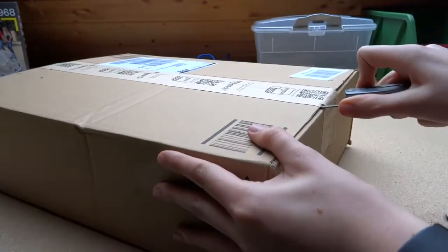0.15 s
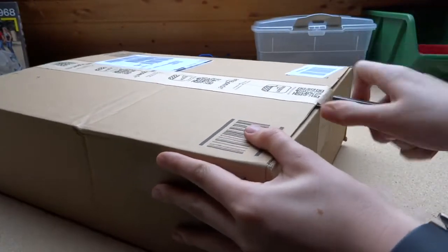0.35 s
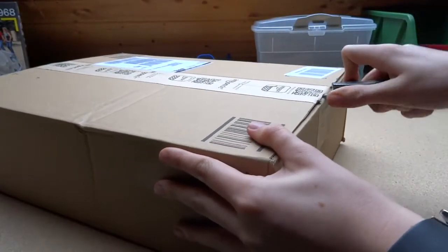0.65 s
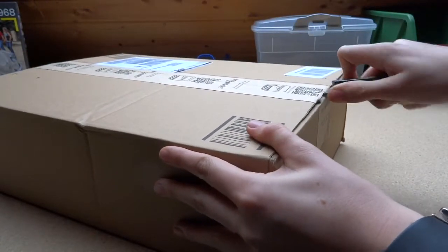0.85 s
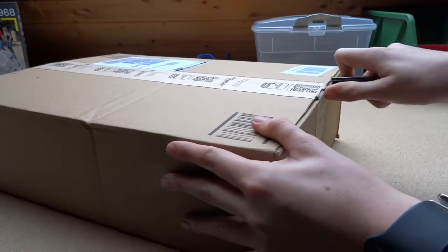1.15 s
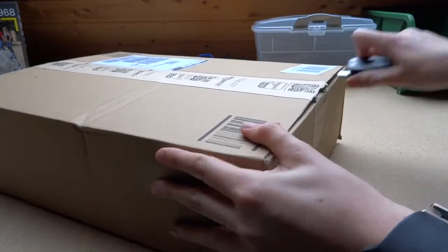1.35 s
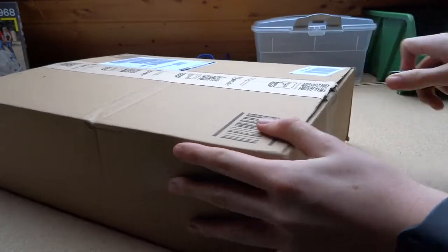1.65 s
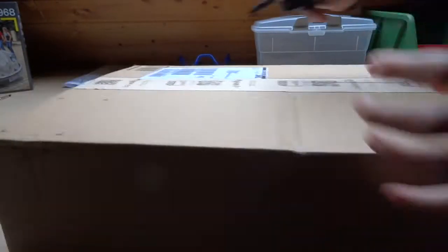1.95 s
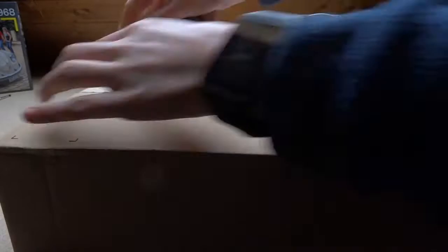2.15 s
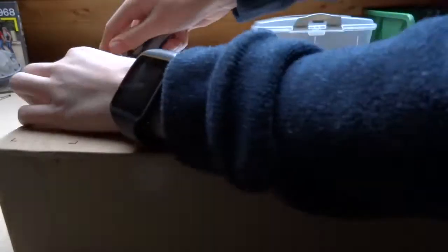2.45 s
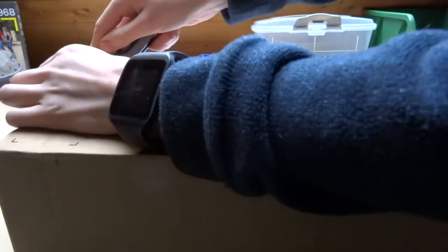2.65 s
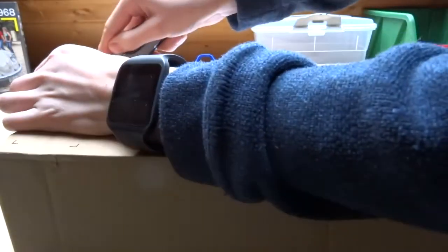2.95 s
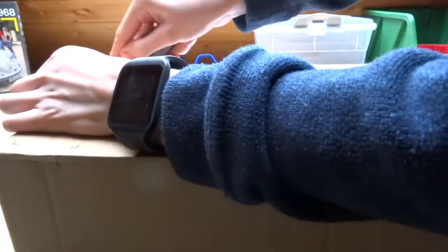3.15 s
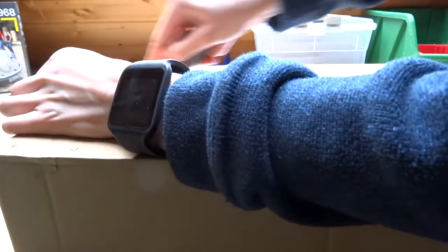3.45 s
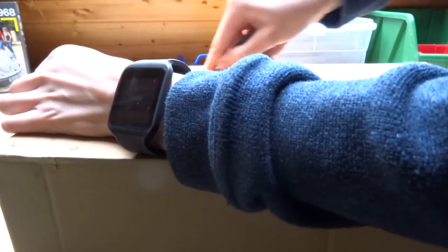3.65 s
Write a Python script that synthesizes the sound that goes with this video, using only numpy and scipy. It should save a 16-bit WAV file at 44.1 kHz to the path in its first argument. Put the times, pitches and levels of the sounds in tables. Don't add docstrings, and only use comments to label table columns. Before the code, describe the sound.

Blade on packing tape, close and dry: sharp knocks and crackling rips, a gritty cardboard slide with small squeaks, faint rubs and ticks, then a dense burst of hollow snaps in a quiet room.

```python
import sys
import numpy as np
from scipy import signal
from scipy.fft import rfft, irfft
from scipy.io import wavfile
from scipy.ndimage import uniform_filter1d

SR = 44100
rng = np.random.default_rng(int(sys.argv[2]) if len(sys.argv) > 2 else 0)


def nominal_scale(level):
    x = np.asarray(level, float) / 20
    return 10 ** x


def wrap_up_sound(samples):
    columns = np.atleast_2d(samples).T
    tamed = np.clip(columns, -1, 1)
    steps = np.round(tamed * 32767).astype(np.int16)
    wavfile.write(sys.argv[1], SR, steps)


N = 167580

# start_s, knock_peak_db, knock_pitch_hz,
# tape_db
BLADE_SNAPS = [(0.2924, -3, 7700, -23), (0.298, -14, 6950, -30.5), (.415, -13.5, 1380, -30),
               (0.436, -15, 1400, -41), (.494, -21, 1150, -19), (0.503, -9.5, 398, -47),
               (.519, -39, 775, -24), (0.6113, -27, 9000, -34.5), (0.716, -31, 1570, -37),
               (0.851, -28, 1420, -26), (.863, -11, 934, -20.5), (0.922, -13, 1570, -21),
               (1.126, -23, 670, -43), (1.3229, -10, 1300, -17), (1.392, -3.5, 1210, -15),
               (1.5054, -13, 1190, -42), (1.509, -17, 448, -60),
               (2.237, -32, 1130, -47), (2.241, -36.5, 232, -78), (2.385, -29, 1110, -61),
             (2.4425, -21.5, 1610, -47), (2.447, -27, 426, -70), (2.68, -31.5, 840, -47),
             (2.768, -40, 415, -42), (3.065, -27, 650, -31.5), (3.087, -19, 2120, -33.5),
             (3.169, -34, 925, -34), (3.208, -17.5, 2200, -43), (3.265, -24, 920, -34),
             (3.303, -36, 950, -35), (3.339, -5.5, 2100, -27), (3.365, 0.5, 2110, -22.5),
             (3.394, -18.5, 355, -27.5), (3.436, -22, 560, -36), (3.458, -12, 513, -24),
             (3.48, -1.5, 580, -24), (3.504, -7, 805, -42), (3.522, -7.5, 387, -22), (3.549, -2, 371, -20),
             (3.571, -6, 1000, -46), (3.783, -2.5, 734, -21.5)]
# start_s, length_s, box_db, tape_db
LONG_RIPS = [
    (0.481, 0.023, -27, -21),
    (0.86, 0.046, -32.5, -29.5),
    (1.327, 0.081, -26, -24.5),
    (2.768, 0.0057, -40, -48.5),
    (3.086, 0.0092, -42, -47),
    (3.498, 0.097, -24, -26),
    (3.72, .1, -26.5, -30.5),
]
# start_s, length_s, box_db, tape_db
SHORT_SLIPS = [(.655, 0.0045, -64, -38.5), (.666, 0.0044, -70, -39), (.689, 0.0061, -70, -46.5),
               (.727, 0.0044, -62, -34.5), (.74, 0.0033, -62, -28.5), (.76, 0.0057, -51, -39),
               (1.012, 0.0032, -60, -35), (1.258, .004, -55, -41), (1.3, 0.021, -46, -42),
               (1.352, 0.0052, -38, -24), (1.368, .008, -33, -22), (1.728, 0.0084, -39, -36),
               (1.748, 0.0064, -49, -29), (1.786, 0.0047, -54, -19.5), (1.81, 0.02, -34.5, -23),
               (1.85, 0.0063, -44, -23), (2.782, 0.0049, -46, -47), (3.088, 0.014, -40, -38),
               (3.204, 0.0077, -32.5, -27.5), (3.258, 0.013, -34, -32.5), (3.3, 0.016, -35.5, -39),
               (3.432, 0.0095, -25.5, -25), (3.453, 0.012, -21, -26.5), (3.518, 0.005, -26, -26.5),
               (3.572, 0.0084, -20, -27.5), (3.775, 0.004, -15, -23)]
# time_s, slips_per_s, level_db
BLADE_CHATTER = [
    (1.33, 262, -28),
    (1.345, 320, -24.5),
    (1.37, 333, -22.5),
    (1.388, 318, -22.5),
    (1.4, 100, -62),
]
# centre_s, band_hz, width_hz, level_db, half_length_s
BLADE_SINGS = [
    (.885, 1450, 400, -32, .025),
    (1.362, 10300, 1600, -28, .022),
    (2.93, 6900, 400, -59, .02),
    (2.96, 3250, 550, -57, .07),
    (3.05, 5400, 650, -49, .05),
    (3.73, 4650, 550, -43, .07),
    (3.73, 9600, 1000, -43, .07),
]
# centre_s, pitch_hz, level_db, second_partial_db,
# half_length_s
LOAD_SQUEAKS = [
    (.83, 1400, -48, -62, .02),
    (1.415, 1280, -31, -45, .012),
    (1.736, 1220, -31, -32, .007),
    (1.753, 1200, -33, -40, .005),
    (1.79, 2750, -52, -37, .004),
    (1.817, 1250, -31, -45, .004),
    (1.818, 950, -45, -29, .005),
    (1.831, 1220, -38, -24, .007),
    (1.855, 1180, -34, -35, .005),
    (2.325, 1100, -54, -72, .035),
                (.4965, 3100, -20.5, -52, 0.0052),
    (0.502, 1500, -21.5, -45, 0.0052),
    (0.51, 500, -29, -39, 0.002),
    (1.99, 1450, -43, -70, 0.015),
    (2.1, 620, -57, -80, 0.07),
    (3.215, 2150, -31, -57, .005),
    (3.443, 540, -18.5, -30, 0.0068),
    (3.455, 530, -17, -30, 0.0054),
    (3.588, 2200, -29.5, -44, 0.023),
]
# time_s, speed_db
SLIDE_SPEED = [
    (1.57, -58),
    (1.63, -38),
    (1.72, -30),
    (1.77, -27),
    (1.86, -28),
    (2.0, -35),
    (2.075, -42.5),
    (2.105, -58),
    (2.19, -77),
]
# start_s, length_s, box_db, hiss_db
BOX_RUBS = [(-.04, 0.18, -50.5, -48), (.115, 0.15, -45.5, -38.5), (.301, 0.075, -50, -43.5),
            (.352, 0.13, -44.5, -39.5), (.54, 0.036, -43.5, -44), (.6, 0.037, -52.5, -50),
            (.655, 0.048, -68, -54), (.715, 0.075, -50.5, -45), (.8, 0.033, -45, -46),
            (.94, 0.2, -48.5, -45), (1.045, 0.14, -44.5, -45.5), (1.25, 0.14, -42, -49),
            (1.43, 0.12, -39, -40.5), (1.5, 0.02, -62, -42), (2.03, 0.058, -50, -75),
            (2.29, 0.031, -66, -53.5), (2.435, 0.15, -50.5, -53.5), (2.62, 0.091, -62.5, -80),
            (2.855, 0.13, -50.5, -52.5), (2.995, 0.1, -47.5, -45), (3.135, 0.28, -45, -42.5),
            (3.375, 0.046, -30, -32.5), (3.44, 0.051, -42, -31), (3.6, 0.15, -31.5, -35.5)]
# freq_hz, gain_db
BOX_TONE = [(40, -49), (120, -13.5), (220, -2.5), (400, -2), (1250, 0), (2500, -3), (4000, -13.5),
            (7000, -57.5)]
# freq_hz, width_hz, gain_db
BOX_MODES = [(230, 44, 1), (397, 27, 4), (544, 57, -2.5), (780, 210, -9.5), (960, 60, 1), (1300, 31, -32),
             (2200, 22, -10), (2277, 44, 0.5)]
# freq_hz, gain_db
TAPE_TONE = [(300, -43), (1000, -10.5), (2500, -3), (4000, -2), (6000, 2), (8000, -1.5), (10000, 0),
             (11000, 1)]
# freq_hz, width_hz, gain_db
TAUT_TAPE_MODES = [(1475, 320, 14), (3500, 470, -4.5), (10820, 3300, 1.5)]
# freq_hz, width_hz, gain_db
BLADE_MODES = [(3180, 600, 9), (5100, 330, -2.5), (6970, 260, -8), (9420, 2200, -1.5)]
# freq_hz, gain_db
SLIDE_TONE = [(90, -45), (200, -14.5), (340, -10.5), (1340, -3.5), (3190, -2.5), (4360, -7), (11000, -7)]
# freq_hz, gain_db
HUSH_TONE = [(40, -3), (120, -19), (300, -11.5), (600, -2.5), (1600, -4.5), (4000, -15), (11000, -17)]
# freq_hz, t60_s
ROOM_T60 = [(200, 0.22), (8000, 0.12)]
# freq_hz, side_minus_mid_db
SIDE_TONE = [(30, -19), (120, -34), (600, -20.5), (2000, -16), (5000, -11), (11000, -12.5)]
# time_s, left_gain_db (right gets the opposite)
PAN = [(0, 0.9), (2.2, 0.47), (2.45, 1.46), (3.8, 0.4)]

RIP_RISE_S, RIP_FADE_S = 0.0065, 0.026
SLIP_RISE_S, SLIP_FADE_S = 0.0062, 0.0033
RUB_RISE_S, RUB_FADE_S = 0.022, 0.024
NICK_RISE_S, NICK_HOLD_S, NICK_BOX_FADE_S, NICK_TAPE_FADE_S = 0.001962, 0.003, 0.012, 0.0045
DRUM_DB, TICK_DB, KNOCK_DB, PATCH_DB, HUSH_DB = -21, -16, -6, 2, -55.5
KNOCK_RISE_CYCLES, KNOCK_FADE_CYCLES, KNOCK_ROUGH, KNOCK_CUT_HZ = 0.15, 2.5, 0.43, 190
KNOCK_SAMPLES = 1800
FAR_TAPE_S = 2.8
LOW_CUT_HZ, CEILING, EDGE_HZ, LEAK_DB = 122, 0.81, 11037, -53


def blade():
    rips = strokes(LONG_RIPS, RIP_RISE_S, RIP_FADE_S)
    slips = strokes(SHORT_SLIPS, SLIP_RISE_S, SLIP_FADE_S)
    box_power, tape_power = rips ** 2 + slips ** 2
    ticks, knocks = np.zeros((2, N))
    for start_s, knock_db, hz, tape_db in BLADE_SNAPS:
        if hz < 3000:
            drum = burst(start_s, NICK_HOLD_S, NICK_RISE_S, NICK_BOX_FADE_S)
            box_power = box_power + nominal_scale(2 * (knock_db + DRUM_DB)) * drum ** 2
        crackle = burst(start_s, NICK_HOLD_S, NICK_RISE_S, NICK_TAPE_FADE_S)
        tape_power = tape_power + nominal_scale(2 * tape_db) * crackle ** 2
        at = round((start_s + NICK_RISE_S) * SR)
        ticks[at] = nominal_scale(tape_db + TICK_DB)
        knocks[at:at + KNOCK_SAMPLES] += knock(knock_db + KNOCK_DB, hz)[:N - at]
    box = np.sqrt(box_power) * grit(1500, 0.82, 0.61, 1.8)
    tape = np.sqrt(tape_power) * grit(2500, 3.0, 2.14, 1.0) + ticks
    return box, tape, knocks


def knock(db, hz):
    t = np.arange(KNOCK_SAMPLES) / SR
    rough = 1 + KNOCK_ROUGH * evened(uniform_filter1d(rng.standard_normal(len(t)), size=30))
    envelope = np.tanh(t * hz / KNOCK_RISE_CYCLES) * np.exp(-t * hz / KNOCK_FADE_CYCLES)
    return nominal_scale(db) * rough * envelope * np.sin(2 * np.pi * hz * t)


def chatter():
    wobble = evened(uniform_filter1d(rng.standard_normal(N), size=100))
    slips_per_s = np.maximum(curve(BLADE_CHATTER, 1), 100) * (1 + 0.206 * wobble)
    turns = np.cumsum(slips_per_s) / SR
    pulses = sum(np.cos(2 * np.pi * k * turns) * nominal_scale(-5. * k) for k in range(1, 7))
    return nominal_scale(curve(BLADE_CHATTER, 2)) * evened(pulses)


def sings():
    t, hz = np.arange(N) / SR, np.fft.rfftfreq(N, 1 / SR)
    hiss = rfft(grit(2500, 6.5, 1.6, 1.5))
    out = np.zeros(N)
    for centre_s, band_hz, width_hz, db, half_s in BLADE_SINGS:
        band = evened(irfft(hiss / (1 + (2 * (hz - band_hz) / width_hz) ** 2), N))
        out += nominal_scale(db) * np.exp(-((t - centre_s) / half_s) ** 2) * band
    return out


def squeaks():
    t, out = np.arange(N) / SR, np.zeros(N)
    drift, rough = (evened(uniform_filter1d(v, size=80)) for v in rng.standard_normal((2, N)))
    wavering_s = t + 0.06 * np.cumsum(drift) / SR
    for centre_s, hz, db, second_db, half_s in LOAD_SQUEAKS:
        phase = 2 * np.pi * hz * wavering_s
        tone = nominal_scale(db) * np.sin(phase) + nominal_scale(second_db) * np.sin(2 * phase)
        out += np.exp(-((t - centre_s) / half_s) ** 2) * tone
    return (1.1 + 0.7 * rough) * out


def slide():
    return colour(nominal_scale(curve(SLIDE_SPEED, 1)) * grit(3000, 2.4, 1.6, 0.37), SLIDE_TONE)


def rubs():
    press, hiss = strokes(BOX_RUBS, RUB_RISE_S, RUB_FADE_S)
    return press * grit(1500, 7.3, 3.2, 0.83), hiss * grit(3800, 4.7, 3.8, 0.53)


def surface(force):
    far = np.arange(N) > FAR_TAPE_S * SR
    return colour(force * ~far, TAPE_TONE, TAUT_TAPE_MODES) + colour(force * far, TAPE_TONE, BLADE_MODES)


def patchy(x):
    z = signal.stft(x, nperseg=256)[2]
    field = uniform_filter1d(rng.standard_normal(z.shape), size=3, axis=0)
    field = evened(uniform_filter1d(field, size=12, axis=1))
    return signal.istft(z * nominal_scale(PATCH_DB * field), nperseg=256)[1][:N]


def room(x):
    at, taps = np.arange(200, 17000, 20), np.zeros((2, 17100))
    places = at + rng.integers(0, 20, (2, len(at)))
    np.put_along_axis(taps, places, rng.choice([-1., 1.], (2, len(at))), 1)
    hz, t, z = signal.stft(taps, SR, nperseg=256)
    t60_s = np.maximum(read(ROOM_T60, hz), 0.02)[:, None]
    tail = signal.istft(z * nominal_scale(-60 * t / t60_s), SR, nperseg=256)[1]
    return signal.fftconvolve(x[None], tail / np.linalg.norm(tail[0]), axes=1)[:, :N]


def hush():
    return nominal_scale(HUSH_DB) * colour(rng.standard_normal(N), HUSH_TONE)


def grit(slips_per_s, spread_db, smooth, flutter_db):
    chance, excess = rng.random(N), rng.exponential(1, N)
    sign, noise, slow = rng.standard_normal((3, N))
    slips = (chance < slips_per_s / SR) * np.sign(sign) * nominal_scale(spread_db * np.minimum(excess, 4))
    flutter = evened(uniform_filter1d(uniform_filter1d(slow, size=220), size=220))
    return evened((evened(slips) + smooth * noise) * nominal_scale(flutter_db * flutter))


def strokes(rows, rise_s, fade_s):
    power = np.zeros((2, N))
    for start_s, length_s, *db in rows:
        power += np.outer(nominal_scale(2 * np.array(db)), burst(start_s, length_s, rise_s, fade_s) ** 2)
    return np.sqrt(power)


def burst(start_s, length_s, rise_s, fade_s):
    t = np.arange(N) / SR - start_s
    return np.clip(t / rise_s, 0, 1) * np.exp(-np.maximum(t - abs(length_s), 0) / fade_s)


def colour(x, tone, modes=()):
    hz = np.fft.rfftfreq(4096, 1 / SR)
    bumps = sum(nominal_scale(db) / (1 + (2 * (hz - f) / width) ** 2) for f, width, db in modes)
    gain = nominal_scale(read(tone, hz)) * (1 + bumps)
    log_gain = np.log(np.r_[gain, gain[-2:0:-1]] + 1e-5)
    taps = np.fft.ifft(np.exp(np.conj(signal.hilbert(log_gain)))).real[:2048]
    return signal.oaconvolve(x, taps / np.linalg.norm(taps))[:N]


def curve(rows, column):
    rows = np.array(rows)
    return np.interp(np.arange(N) / SR, rows[:, 0], rows[:, column], -120, -120)


def read(points, hz):
    f, value = np.transpose(points)
    return np.interp(np.log(hz + 1), np.log(f + 1), value)


def evened(x):
    return x / np.sqrt(np.mean(x ** 2) + 1e-20)


def scene():
    box, tape, knocks = blade()
    knock_cut = signal.butter(2, KNOCK_CUT_HZ, "high", fs=SR, output="sos")
    knocks = signal.sosfilt(knock_cut, knocks + squeaks())
    press, hiss = rubs()
    body = colour(box + press, BOX_TONE, BOX_MODES)
    near = patchy(body + surface(tape + hiss) + slide())
    near = near + knocks + chatter() + sings() + hush()
    left, right = room(near)
    mid = near + nominal_scale(-14) * (left + right)
    hz = np.fft.rfftfreq(N, 1 / SR)
    side = irfft(rfft(nominal_scale(-2.5) * (left - right)) * nominal_scale(read(SIDE_TONE, hz)), N)
    tilt_db = read([(500, -0.55), (2000, -0.26), (6000, -0.84), (10000, -1.8)], hz)
    tilt = irfft(rfft(mid) * nominal_scale(tilt_db), N) - mid
    pan_db = curve(PAN, 1)
    pan = nominal_scale(pan_db * (pan_db > -99))
    return np.array([(mid + side + tilt) * pan, (mid - side - tilt) / pan])


def top_cut(x):
    return signal.sosfilt(signal.butter(12, 12390, fs=SR, output="sos"), x)


def record(dry):
    thin = signal.sosfilt(signal.butter(2, LOW_CUT_HZ, "high", fs=SR, output="sos"), dry)
    soft = CEILING * np.tanh(thin / CEILING)
    band_limit = signal.firwin(301, EDGE_HZ, window=("kaiser", 8), fs=SR)
    cut = signal.oaconvolve(soft, band_limit[None], "same")
    return top_cut(cut + nominal_scale(LEAK_DB) * soft)


dry = scene()
out = record(dry)
wrap_up_sound(out)
```